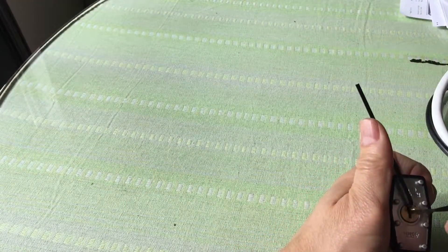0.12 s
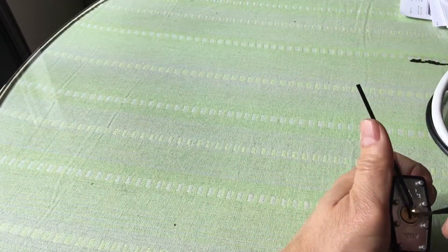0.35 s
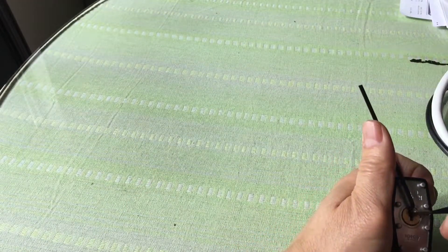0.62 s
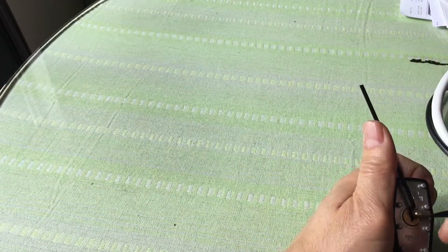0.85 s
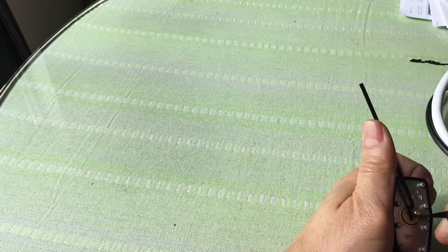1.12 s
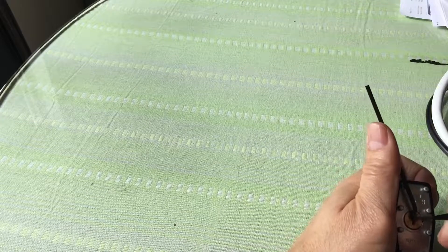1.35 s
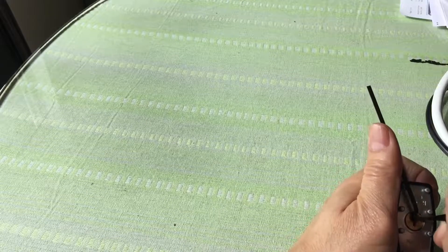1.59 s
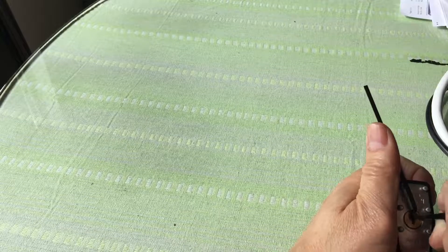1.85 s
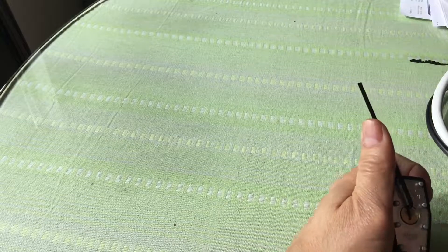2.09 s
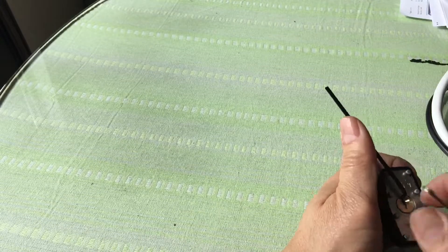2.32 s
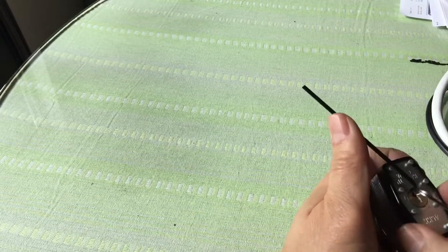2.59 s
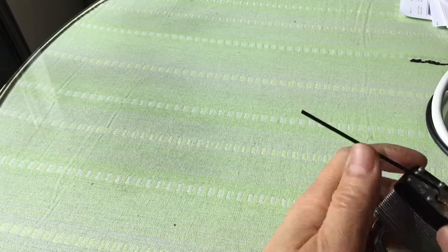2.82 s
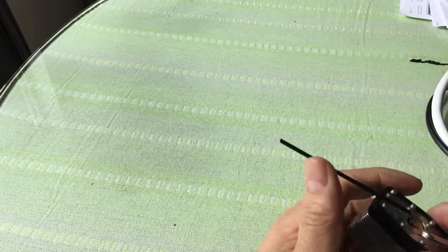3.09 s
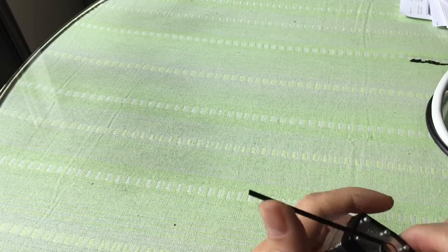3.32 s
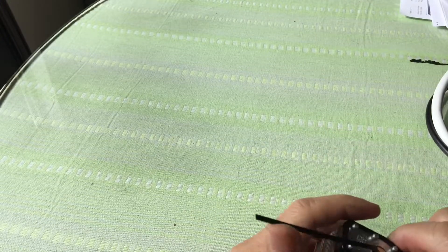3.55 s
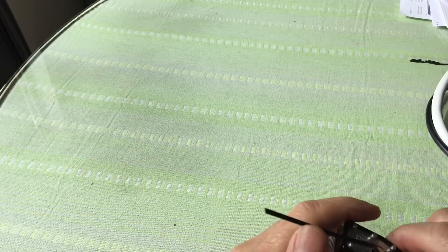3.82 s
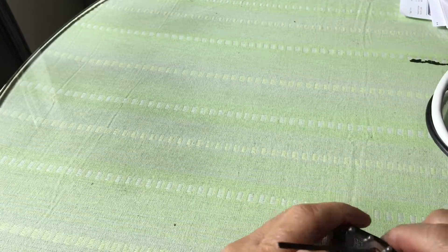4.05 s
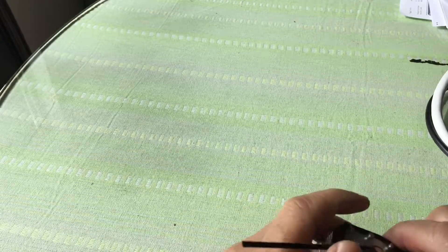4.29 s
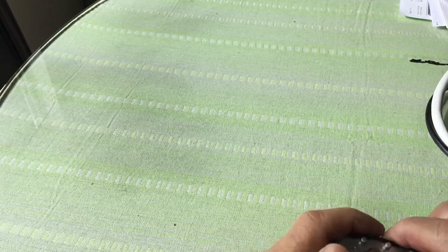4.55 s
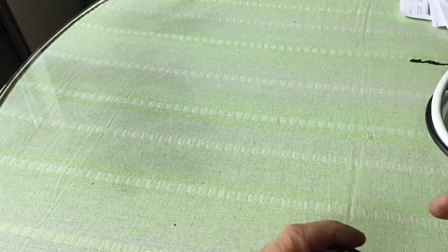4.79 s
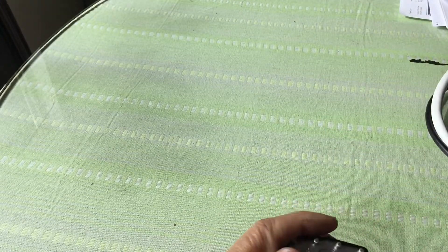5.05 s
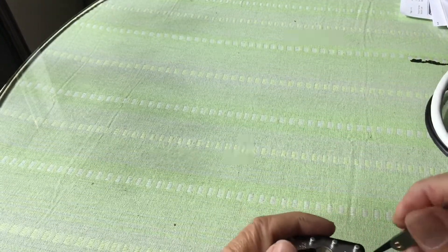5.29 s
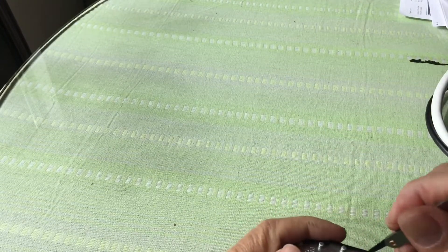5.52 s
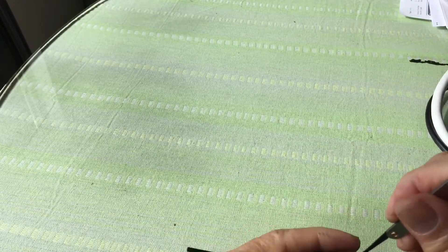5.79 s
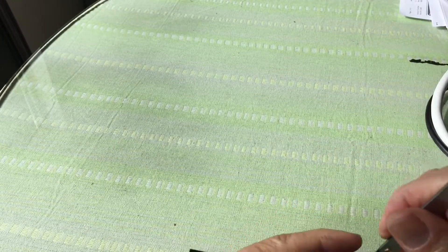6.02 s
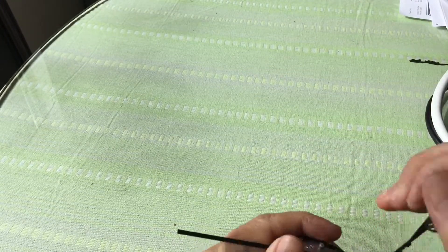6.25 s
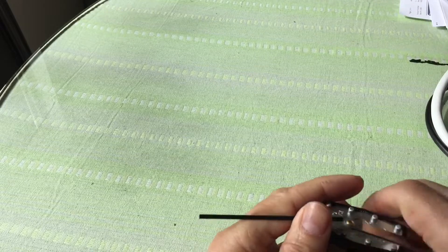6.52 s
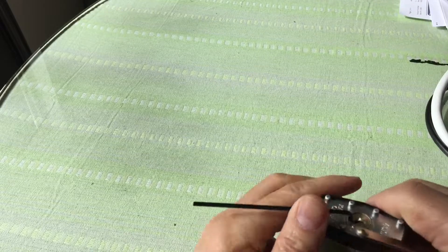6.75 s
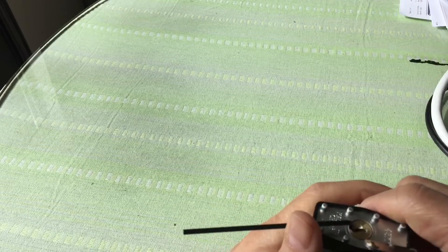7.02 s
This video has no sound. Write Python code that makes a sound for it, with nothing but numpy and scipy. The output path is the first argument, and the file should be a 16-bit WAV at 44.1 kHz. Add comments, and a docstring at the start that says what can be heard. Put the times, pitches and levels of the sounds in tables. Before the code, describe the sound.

Tiny dry metallic ticks with short rattling rebounds come from a padlock being picked by hand over a glass table. They start sparse, become busy, then peak in a crunchy snap. A faint rub and lone ticks follow. Late on, one hard glassy knock towers over everything and dies quickly in the room; a dull, quieter knock comes half a second after, then soft handling. Close microphone, low steady hiss.

```python
"""Picking a padlock at a glass table

A thin steel pick clicks over the pins of a padlock held close to the microphone: gritty slips ring the lock body.
A hard knock on the glass table, then a duller one: gliding bending waves, decaying glass modes and room tails.
Soft low bumps are short pairs of sines; filtered noise makes the finger rub, a faint wavering tone and the hiss."""
import sys
import numpy as np
from scipy import signal
from scipy.io import wavfile
from scipy.ndimage import uniform_filter1d

SR = 44100
rng = np.random.default_rng(int(sys.argv[2]) if len(sys.argv) > 2 else 0)


def to_wav(sig):
    """Store sig (one row per channel, or 1-D mono) as 16-bit WAV at the path in sys.argv[1].

    Samples outside -1..1 are clipped; the rate is SR.
    """
    pcm = np.clip(np.atleast_2d(sig), -1, 1) * 32767
    pcm = np.round(pcm).astype(np.int16)
    wavfile.write(sys.argv[1], SR, pcm.T)  # frames by channels


def ratio_of_db(decibels):
    """Turn decibels (scalar or array-like) into linear amplitude factors; 0 dB maps to 1."""
    return 10 ** (np.asarray(decibels, float) / 20)


N = 314433  # length in samples

# spectra of the hard and of the dull knock, one list each: pitch_hz, level_db (per Hz, relative)
KNOCK_COLOURS = [
    [(35, -35), (65, -14.5), (98, -24.5), (130, -11.5), (222, -16.5), (330, -6.5), (448, -15.5), (666, -16),
     (715, -14.5), (991, -16), (1200, -15), (2470, -5.5), (3040, -19), (4220, -15.5), (16000, -42)],
    [(35, -24), (60, -0.5), (136, 2.5), (220, -19), (328, -4), (669, -3.5), (758, -17.5), (996, -7),
     (2350, -23), (3700, -31.5), (4500, -38), (9000, -55), (11700, -81), (19800, -120)],
]


def evened(x):
    """Scales a signal to an rms of 1."""
    return x / np.sqrt(np.mean(x ** 2) + 1e-20)


def read(points, hz):
    """Reads a curve of (Hz, value) points along a logarithmic frequency axis."""
    f, value = np.transpose(points)
    return np.interp(np.log(hz + 1), np.log(f + 1), value)


def add(mix, start_s, sound):
    """Lays a sound into the mix, cut off at its end."""
    part = mix[round(start_s * SR):][:len(sound)]
    part += sound[:len(part)]


def causal(db):
    """Impulse response of the least delay for a gain curve in dB on an rfft grid."""
    both_sides_db = np.r_[db, db[-2:0:-1]]
    log_gain = np.log(ratio_of_db(np.maximum(both_sides_db, -100)))
    return np.fft.ifft(np.exp(np.conj(signal.hilbert(log_gain)))).real


def hiss():
    """Hiss of room and microphone: random short-time spectra, lumpy in the bass, smoother above."""
    # spectrum of the hiss: pitch_hz, level_db (per Hz, relative)
    hiss_colour = [(12, -52.5), (20, -10.5), (55, -4), (130, -5.5), (268, -8.5), (386, -8), (431, -12),
                   (655, -13), (797, -14), (2060, -16), (4370, -21), (4890, -24.5), (5950, -22),
                   (9300, -26), (10500, -29.5), (11800, -26.5), (15800, -32)]
    frames, hz = N // 256 + 5, np.fft.rfftfreq(1024, 1 / SR)
    real, imaginary, patches = rng.standard_normal((frames, 513, 3)).T
    patches = uniform_filter1d(patches, 8, axis=0)  # smooth over pitch
    patches = evened(uniform_filter1d(patches, 16, axis=1))  # smooth over time
    lumpy_db = read([(100, 1.6), (600, .9), (10000, .4)], hz)[:, None]
    gain = ratio_of_db(read(hiss_colour, hz)[:, None] + lumpy_db * patches)
    noise = signal.istft((real + 1j * imaginary) * gain, nperseg=1024, noverlap=768)[1][:N]
    return ratio_of_db(-69) * evened(noise)


def click(length_ms, band_db, loudest_hz):
    """A short gritty slip rings the lock; where the pick bites sets which modes speak."""
    # modes of lock body and pick: pitch_hz, width_hz, height_db (before chance and evening out)
    lock_modes = [(2350, 500, 5), (3850, 550, 7), (4500, 450, 4), (5400, 450, 5), (6250, 500, 7),
                  (7050, 400, 4), (8750, 500, 8), (9750, 400, 5), (12150, 550, 9), (14300, 800, 7),
                  (15400, 450, 3)]
    boost_db, boost_width_hz = 7, 1400  # lifts the loudest ring
    u = np.arange(1500) / SR / (length_ms / 1000)
    slip = rng.standard_normal(1500) * u ** .7 * np.exp(-(u * 1.6) ** 2)

    hz = np.fft.rfftfreq(2048, 1 / SR)
    peaks = np.full(len(hz), .6)  # the broad grit under the modes
    for (f, width, db), bite in zip(lock_modes, rng.standard_normal(len(lock_modes))):
        tuned_hz = f * (1 + .03 * np.tanh(bite * 9))
        height = ratio_of_db(db + 3.0 * np.tanh(bite))
        peaks += height / (1 + ((hz - tuned_hz) / (width / 2)) ** 2)
    peaks_db = 10 * np.log10(peaks ** 2 / uniform_filter1d(peaks ** 2, 140))  # over their surroundings

    low, middle, high, top = band_db
    bands = [(1100, low - 28), (2200, low), (3600, middle), (6000, middle), (8500, high), (12500, top)]
    loudest_db = boost_db / (1 + ((hz - loudest_hz) / (boost_width_hz / 2)) ** 2)
    colour = causal(read(bands, hz) + loudest_db + peaks_db)
    sound = signal.fftconvolve(slip, colour[:1024])
    return sound * np.linalg.norm(colour) / np.linalg.norm(sound)


def bands_db(db, tilt_db, bow_db):
    """Levels near 2, 4.5, 8.5 and 13 kHz: a tilted, bowed line over the octaves from 4.5 kHz."""
    octaves = np.log2(np.array([2200, 4500, 8500, 12500]) / 4500)
    return db + tilt_db * octaves - bow_db * octaves ** 2


def snaps():
    """The pick snaps off a pin and rebounds, each rebound weaker and duller than the last."""
    # snaps: start_s, level_db (energy at 4.5 kHz, before the rings), tilt_db (per octave),
    # bow_db (per octave squared), first_rebound_db (against the snap), loudest_ring_hz
    snap_list = [(0.835, -52, 2, -2, -25, 12150), (0.9025, -36.5, 2.5, 1, -25, 12150),
                 (1.0405, -38.5, 9, -1, -25, 8900), (1.2935, -29.5, 2, 2.5, -16, 4470),
                 (1.297, -30, 3.5, -2, -6, 4870), (1.373, -31, 6.5, 1, -5, 4450),
                 (1.383, -32.5, -1, 4, -14, 4500), (1.5963, -33, 4, 3, -23, 12150),
                 (1.645, -36.5, -4, -2, -25, 2250), (1.694, -39.5, 3, 6, -18, 8750),
                 (1.749, -45, 4, 4, -18, 6250), (2.136, -25, 2.5, 4, -12, 8750),
                 (2.151, -19.5, -1, 3.5, -4, 5400), (2.1613, -13.5, -5, -3, -22, 3830),
                 (2.4465, -42, -2.5, -0.2, -13, 2350), (3.6583, -25.5, 3, 3.5, -16, 8800),
                 (4.0868, -26, 4, 2, -13, 6350), (4.1165, -44, .1, .1, -20, 3850),
                 (5.1055, -25.5, 4.5, 6, -24, 3970), (5.8645, -34.5, -5, -2, -23, 9600),
                 (6.6375, -28.5, -9, -1.5, -17, 1500)]
    snap_ms, rebound_ms = 3.4, 3.6
    rebounds, gap_s = 4, .008
    loss_db, dulling_db = -7.5, -2.5  # per rebound; dulling is a tilt per octave
    out = np.zeros(N)
    for start_s, db, tilt_db, bow_db, rebound_db, ring_hz in snap_list:
        add(out, start_s, click(snap_ms, bands_db(db, tilt_db, bow_db), ring_hz))
        for k in range(rebounds):
            weaker_db = db + rebound_db + k * loss_db
            duller_db = tilt_db + (k + 1) * dulling_db
            rebound = click(rebound_ms, bands_db(weaker_db, duller_db, bow_db), ring_hz)
            add(out, start_s + (k + 1) * gap_s, rebound)
    return out


def scrapes():
    """The pick scrapes along a pin: the same gritty slip, mostly drawn out longer."""
    # scrapes: start_s, length_ms, level_db (energy at 4.5 kHz, before the rings), tilt_db (per octave)
    scrape_list = [(1.313, 13, -40, 1), (1.359, 14, -37, .1), (1.56, 15, -43, 6), (1.626, 5.8, -45, 1),
                   (1.649, 10.5, -29.5, -1.5), (1.665, 16, -43, 4), (1.734, 8.8, -45, 4.5),
                   (2.129, 6.1, -39, .1), (2.142, 13, -22.5, 0.5), (2.375, 18, -47, 7), (2.555, 11, -50, 7),
                   (4.072, 12, -44, 6), (5.091, 9, -46, 2.5), (5.12, 13, -39.5, 4),
                   (6.482, 10.6, -43.5, -2.5), (6.55, 10, -47, 4.5), (6.629, 4.3, -36, -13),
                   (6.645, 17, -38, 8.5)]
    bow_db, ring_hz = 3.7, 4700  # dB per octave squared, loudest ring
    out = np.zeros(N)
    for start_s, length_ms, db, tilt_db in scrape_list:
        add(out, start_s, click(length_ms, bands_db(db, tilt_db, bow_db), ring_hz))
    return out


def dying_noise(t60_points, seconds=1):
    """Dense reflections of energy 1, each band dying at its own speed."""
    steepen_db = -73  # extra loss after one second, growing with time squared
    hz, t, z = signal.stft(rng.standard_normal(round(seconds * SR)), SR, nperseg=256)
    t60 = read(t60_points, hz)[:, None]
    decay_db = -60 * t / t60 + steepen_db * t ** 2
    tail = signal.istft(z * ratio_of_db(decay_db), SR, nperseg=256)[1]
    return tail / np.linalg.norm(tail)


def near_scatter():
    """Scatter from near surfaces, quickly gone."""
    # decay of the scatter, before the steepening: pitch_hz, t60_s
    near_decay = [(3000, 0.14), (7000, 0.14), (12000, 0.051)]
    return dying_noise(near_decay)


def room_tail():
    """The room rings on, longest in the middle treble."""
    # decay of the room, before the steepening: pitch_hz, t60_s
    room_decay = [(80, 0.53), (200, 0.65), (500, 1), (1200, 1.8), (2500, 1.9), (6000, .95), (9000, 0.33),
                  (14000, 0.28)]
    return dying_noise(room_decay)


def bump(level_db, hz, length_ms):
    """A soft hand shakes the table for a few low cycles."""
    t = np.arange(SR // 4) / SR
    u = t / (max(length_ms, 5) / 1000)
    swell = u * np.exp(1 - u * u)
    shake = swell * (np.sin(2 * np.pi * hz * t) + .4 * np.sin(2 * np.pi * 1.7 * hz * t))
    return ratio_of_db(level_db) * shake / abs(shake).max()


def bumps():
    """Hands bump the table softly, again and again."""
    # bumps: start_s, level_db (peak), pitch_hz, length_ms (start to fullest swell, nearly)
    bump_list = [(1.583, -62.5, 259, 17), (1.674, -52, 126, 28), (2.183, -60.5, 88, 17.4),
                 (2.28, -63, 57, 100), (2.464, -61, 226, 23), (3.509, -63, 141, 45), (3.501, -58.5, 46, 53),
                 (3.61, -69, 65, 44), (6.319, -61, 99, 21), (6.33, -64.5, 403, 16), (6.596, -63, 90, 32),
                 (6.776, -58, 194.7, 44), (6.808, -46.5, 145, 6.6)]
    out = np.zeros(N)
    for start_s, *settings in bump_list:
        add(out, start_s, bump(*settings))
    return out


def whine():
    """A faint wavering tone: noise in one narrow band."""
    start_s, length_s = 2.22, .66
    hz, width_hz, rms_db = 1230, 83, -80.5  # level before the fades
    noise = rng.standard_normal(round(length_s * SR))
    edges_hz = [hz - width_hz / 2, hz + width_hz / 2]
    band = signal.sosfilt(signal.butter(2, edges_hz, "band", fs=SR, output="sos"), noise)
    return start_s, ratio_of_db(rms_db) * evened(band) * signal.windows.tukey(len(band), .4)


def rub():
    """Fingers slide round the lock as it is turned: a soft grainy hiss in the low treble."""
    # loudness of the rub over time: time_s, level_db (rms, before the fades)
    rub_levels = [(2.551, -83), (2.82, -76.5), (3.05, -79), (3.32, -72), (3.5, -93)]
    s, db = np.transpose(rub_levels)
    t = np.arange(s[0], s[-1], 1 / SR)
    grain, hush = rng.standard_normal((len(t), 2)).T
    grain = ratio_of_db(1.7 * evened(uniform_filter1d(grain, 150)))
    band = signal.sosfilt(signal.butter(2, [1900, 4200], "band", fs=SR, output="sos"), grain * hush)
    return s[0], ratio_of_db(np.interp(t, s, db)) * evened(band) * signal.windows.tukey(len(t), .2)


def knock(level_db, first_hz, glide_ms, cycles, room_db, colour, early, late):
    """A bending wave arrives treble first; the glass rings, near surfaces scatter, the room answers."""
    # modes of the glass table top: pitch_hz, level_db (relative, as coloured by the hard knock), t60_s
    glass_modes = [(130, -21, .2), (205, -20, .2), (325, -9, .12), (430, -18, .12), (540, -18, .12),
                   (664, -15, .15), (860, -20, .12), (975, -15, .13), (1170, -18, .12), (1407, -13, .14),
                   (1528, -10, .13), (1612, -12, .12), (1715, -11, .12), (1780, -6, .13), (1907, -6, .15),
                   (1994, -8, .15), (2103, -6, .15), (2209, -2, .15), (2308, -10, .13), (2432, -4, .15),
                   (2551, -6, .16), (2690, 3, .11), (2910, -13, .12), (3240, -18, .08), (4080, -18, .1),
                   (4365, -17, .09), (4500, -18, .12), (4750, -19, .1), (5146, -15, .1), (5870, -22, .08)]
    ring_db, early_db, crack_db = 14, 19.5, 10.5  # balance against each other and room_db
    t, glide_s = np.arange(SR) / SR, glide_ms / 1000
    turns = first_hz * glide_s * np.log(1 + t / glide_s)  # the slower bass comes in late
    swell = np.minimum(turns / cycles * 2.5, 1) * np.exp(-(turns / cycles) ** 6)
    wave = -np.sin(2 * np.pi * turns) * swell

    ring = np.zeros(SR)
    for k, (f, db, t60) in enumerate(glass_modes):
        # the blow colours the ring below, so the hard colour is taken off first
        decay = ratio_of_db(db - read(KNOCK_COLOURS[0], f) - 60 * t / t60)
        ring += decay * np.sin(2 * np.pi * f * t + k * k)
    near = ratio_of_db(ring_db) * ring / np.linalg.norm(ring)
    near += ratio_of_db(early_db) * early[:SR] + ratio_of_db(room_db) * late[:SR]
    near *= np.clip((t - .0006) / 0.0018, 0, 1)  # these need a moment to build
    near[0] = ratio_of_db(crack_db)  # the crack of first contact

    blow = causal(read(colour, np.fft.rfftfreq(4096, 1 / SR)))[:2048]
    heard = wave + ratio_of_db(13.0) * signal.fftconvolve(near, blow)[:SR]
    return ratio_of_db(level_db) * signal.sosfilt(signal.butter(1, 110, "high", fs=SR, output="sos"), heard)


def knocks(early, late):
    """A hard knock on the table, then a dull one with a light first touch."""
    # knocks: start_s, level_db, first_hz (first pitch of the bending wave), glide_ms, cycles (of the wave),
    # room_db (room tail, relative)
    knock_list = [(5.3883, -2.5, 2476, 1.9, 2.2, 12.5), (5.8655, -33.5, 2237, 0.59, 0.99, 10),
                  (5.8702, -21, 2400, 0.5, 2.57, 13.5)]
    hard, dull = KNOCK_COLOURS
    out = np.zeros(N)
    for (start_s, *settings), colour in zip(knock_list, [hard, dull, dull]):
        add(out, start_s, knock(*settings, colour, early, late))
    return out


def scene():
    """Clicks with their echoes, knocks, bumps, rub and whine over the hiss."""
    early, late = near_scatter(), room_tail()
    picks = snaps() + scrapes()
    answer = np.r_[np.zeros(100), ratio_of_db(-16) * early + ratio_of_db(-25) * late]  # 100 samples after the click
    echoes = signal.fftconvolve(picks, answer)[:N]
    table = bumps() + knocks(early, late)
    add(table, *whine())
    add(table, *rub())
    return (picks + echoes + table + hiss())[None]


def roll_off(x):
    """The treble ends steeply here."""
    return signal.sosfilt(signal.butter(12, 16480, fs=SR, output="sos"), x)


def record(dry):
    """The microphone drops the deepest bass, below 38 Hz."""
    heard = signal.sosfilt(signal.butter(3, 38, "high", fs=SR, output="sos"), dry)
    return roll_off(heard)


dry = scene()
out = record(dry)
to_wav(out)
```